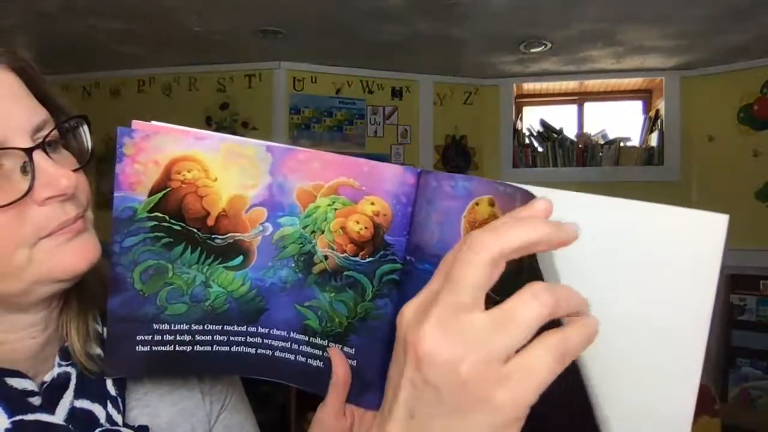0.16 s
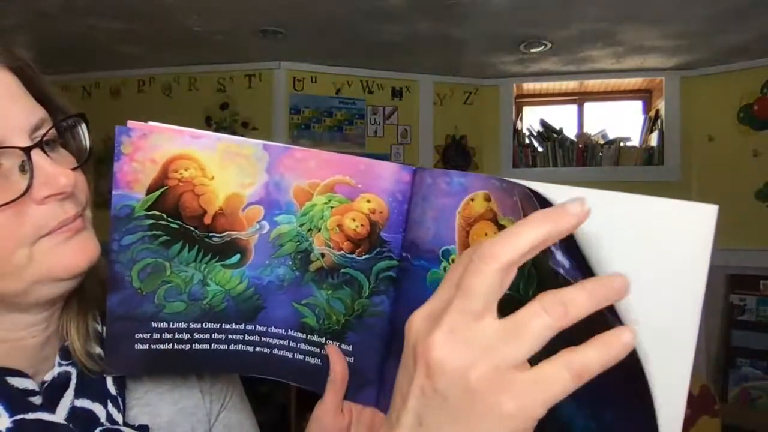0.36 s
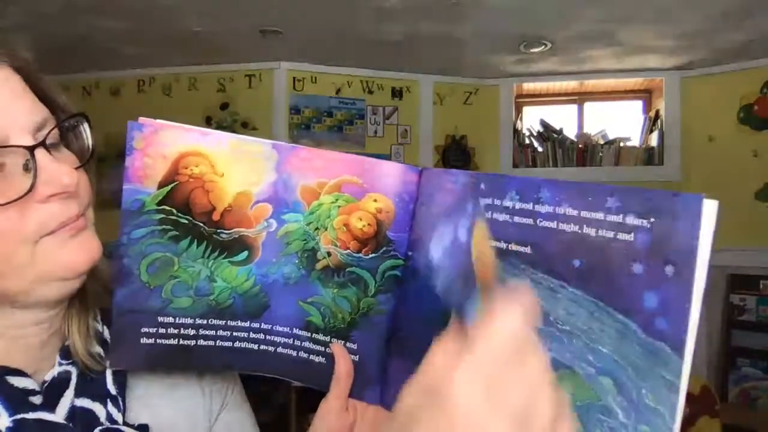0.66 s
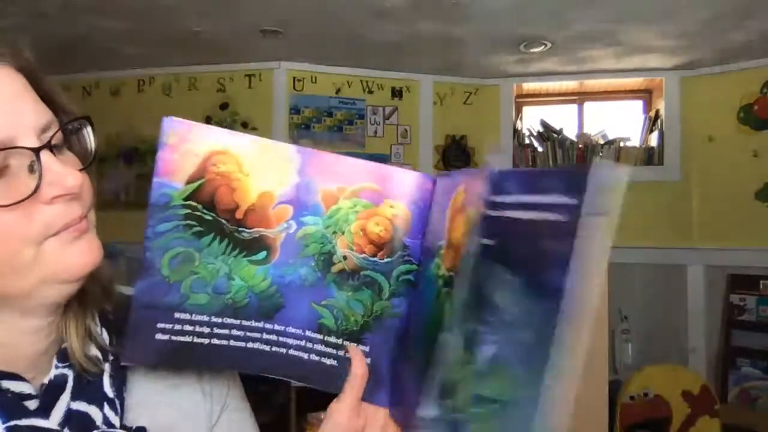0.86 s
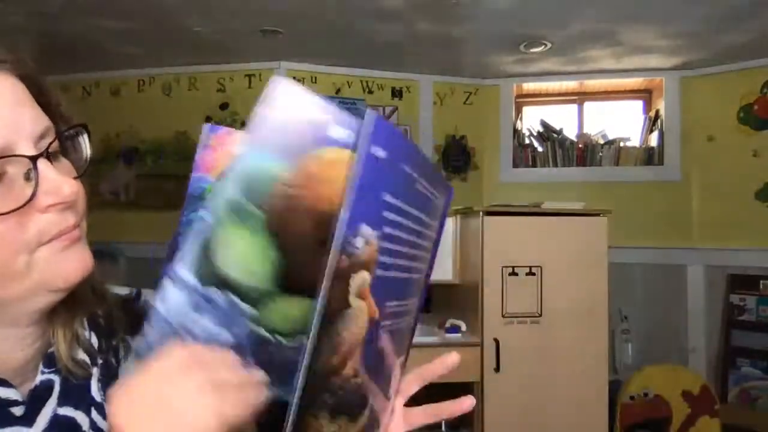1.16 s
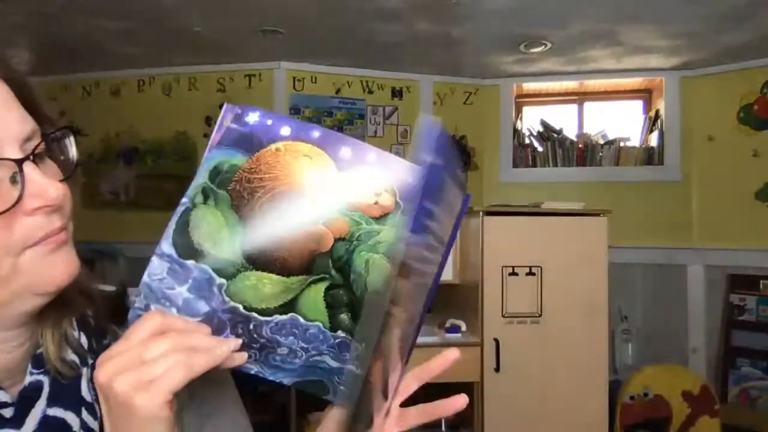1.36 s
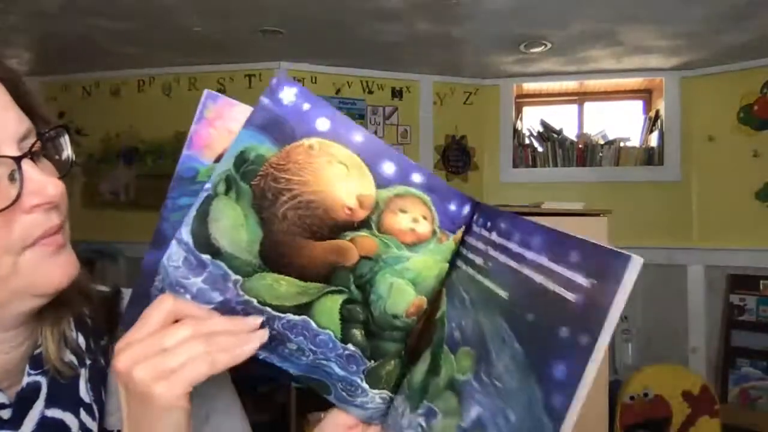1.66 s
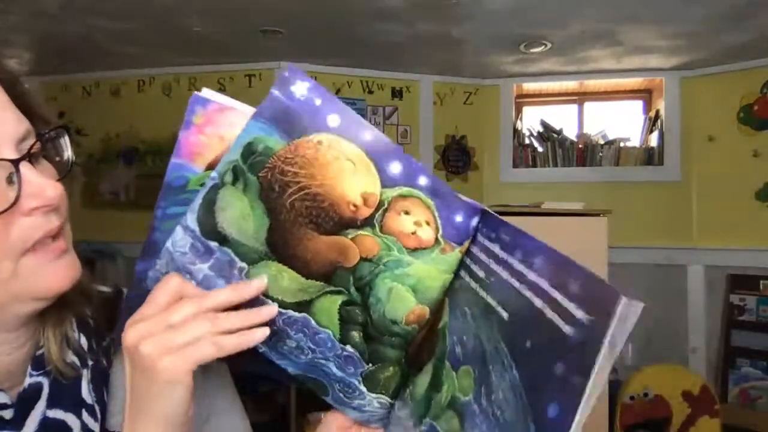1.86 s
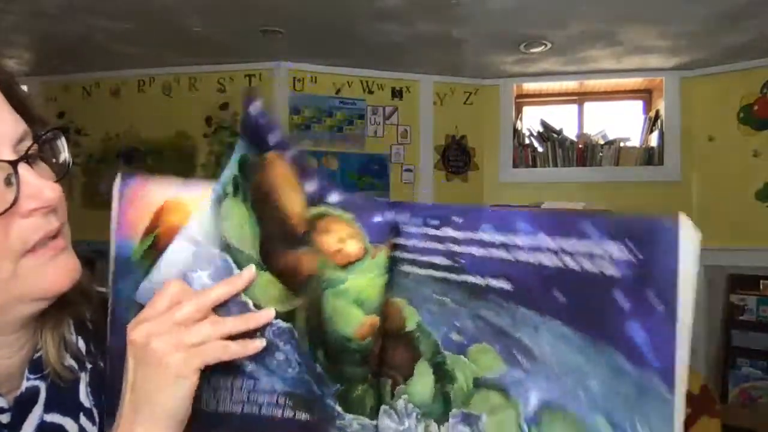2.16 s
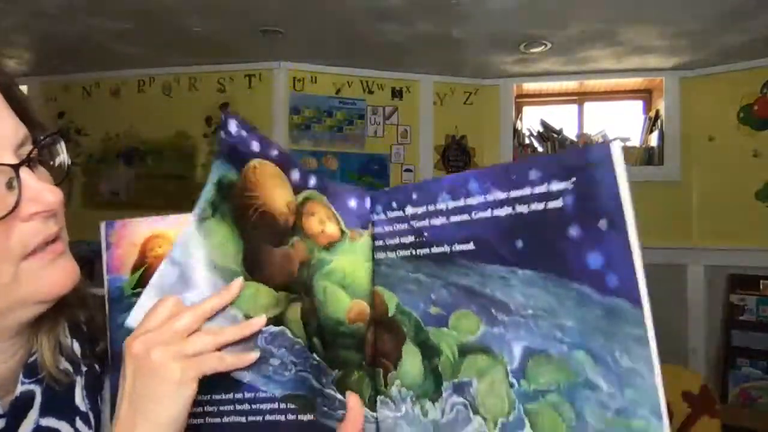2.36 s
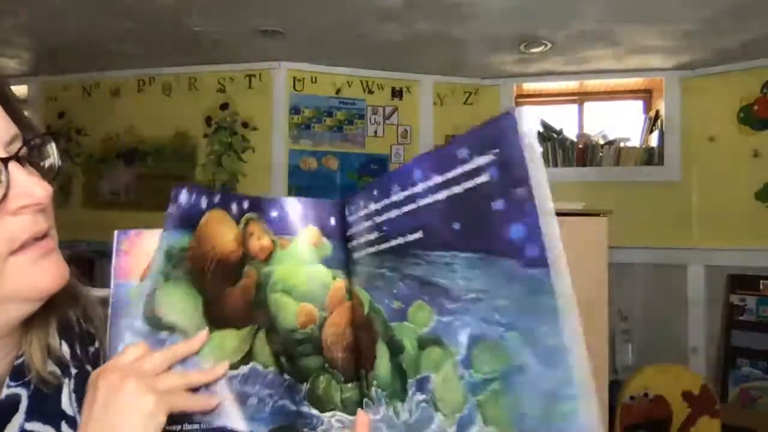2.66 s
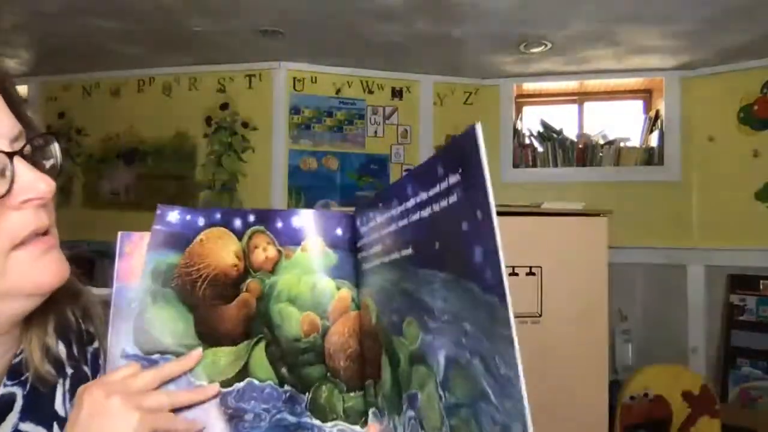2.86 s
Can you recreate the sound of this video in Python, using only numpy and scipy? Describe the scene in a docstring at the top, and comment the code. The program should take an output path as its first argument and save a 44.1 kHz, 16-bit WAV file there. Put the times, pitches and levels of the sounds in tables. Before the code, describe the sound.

A stiff glossy page of a big hardcover book is turned by hand: faint finger rub, papery swishes and light cover bumps, then loud crackling snaps near two seconds and a sliding rustle, close in a quiet room.

```python
"""Stiff page turn

A hand turns a stiff glossy page of a large hardcover book close to a mono microphone in a quiet room.
Sliding skin and paper hiss: dense clicks through a time-varying spectrum. The bending page crackles and
snaps: clicks and noise bursts ring its modes. A pocket of air squeezes out: a noisy tone that jumps up.
Covers wobble (sparse coloured clicks) and thump (decaying sines) over faint steady noise."""
import sys
import numpy as np
from scipy import signal
from scipy.io import wavfile
from scipy.ndimage import uniform_filter1d

SR = 44100
rng = np.random.default_rng(int(sys.argv[2]) if len(sys.argv) > 2 else 0)


def transcribe(signal):
    """Save signal, clipped to [-1, 1], as a 16-bit WAV file at the path in sys.argv[1]."""
    frames = np.atleast_2d(signal).T
    limited = np.clip(frames, -1, 1)
    pcm = np.round(limited * 32767).astype(np.int16)
    wavfile.write(sys.argv[1], SR, pcm)


def ratio_of_db(decibels):
    """Turn decibels (scalar or array-like) into linear amplitude factors; 0 dB maps to 1."""
    return 10 ** (np.asarray(decibels, float) / 20)


N = 132300

# room and microphone noise spectrum: f/Hz, density/dB (relative)
FLOOR_SPECTRUM = [(24, -51), (40, -0.5), (185, -17), (1240, -34), (16000, -46)]
FLOOR_DB = -71.5

# covers wobbling in the hands: t/s, level/dB, brightness/(dB/octave)
WOBBLE_COURSE = [(0, -79, 1), (.36, -89, -15), (.39, -64.5, -12), (.55, -90, 5), (.59, -57.5, -10),
                 (.65, -39, 2), (.76, -74.5, 2), (.82, -41, -0.5), (.945, -41, 1), (.99, -53.5, -5),
                 (1.06, -50, 1), (1.12, -59, 6.3), (1.19, -50, -0.5), (1.27, -60, 7), (1.36, -75, 0),
                 (1.4, -46, -10), (1.48, -47.5, -11), (1.51, -65.5, 1), (1.91, -47, 0), (1.96, -28, -1),
                 (2.1, -41.5, -9.5), (2.28, -53.5, 8.5), (2.39, -41, -2.5), (2.65, -48.5, 12),
                 (2.69, -45, 0.5), (2.87, -56, 3.5), (2.94, -82, -2), (3, -29.5, -12)]
# cover spectrum: f/Hz, density/dB (relative)
WOBBLE_SPECTRUM = [(40, -8.5), (200, 0.7), (400, -4.5), (600, -4.5), (1000, -29.5), (1500, -43)]
KNOCKS_PER_S, KNOCK_SPREAD_DB, WOBBLE_PATCH_DB = 500, 3, 2.5

# fingers bumping the covers: t/s, level/dB, f/Hz
COVER_THUMPS = [(.816, -28, 340), (.849, -30, 260), (.872, -28, 240), (.886, -29, 200), (.941, -25, 520),
                (2.3165, -18, 870), (2.348, -25, 680)]
THUMP_CYCLES_PER_20DB = 6

SQUEEZE_START_S, SQUEEZE_LENGTH_S, SQUEEZE_DB = 2.0565, .022, -17
SQUEEZE_FROM_HZ, SQUEEZE_TO_HZ, SQUEEZE_WIDTH_HZ = 850, 1480, 250
SQUEEZE_STEADY = 2.2  # steady part of the tone over rms of its noisy part
SQUEEZE_BEND = 9  # steepness of the pitch jump
SQUEEZE_HISS_DB = -20  # relative to the tone

# page modes: f/Hz, level/dB, t60/s (at ring share 1)
PAGE_MODES = [(845, -4, 0.045), (1090, -7, 0.03), (1380, -5, 0.037), (1730, -6, 0.03), (2150, -2, 0.04),
              (2590, -12, 0.025), (3130, -10, 0.022), (4165, -15, 0.012), (5900, -14, 0.009)]
MODE_RISE_S, PAGE_LOW_HZ = 0.00012, 600

# page snaps: t/s, ring peak/dB, dullness/(dB/octave)
PAGE_SNAPS = [(.585, -21, -4), (.821, -24, 3), (.85, -20, -1), (1.1195, -29, 0), (1.125, -35, -2),
              (1.133, -37, 0), (1.1485, -23, 0), (1.154, -31, -3), (1.174, -24, 1), (1.1795, -33, -2),
              (1.208, -36, 9), (1.247, -30, 9), (1.528, -32, -4), (1.778, -15, 4), (1.801, -14, -1),
              (1.935, -4, -.5), (1.9535, -4, -2), (1.977, -14, 12), (1.997, -18, 12), (2.118, -17, 2),
              (2.316, -23, -2), (2.349, -25, 6)]
SNAP_RING_SHARE, RING_SHARE_PER_DB = 1.45, 0.06  # share of mode t60 at 0 dB; harder snaps ring longer
SNAP_DETUNE, SNAP_RATTLE, RATTLE_DECAY_S = .02, .07, .005  # decay at ring share 1
CRACK_DB, CRACK_DECAY_S, CRACK_TOP_HZ = -21.0206, .0007, 12000  # noise rms for a 0 dB snap, before low-pass
CRACK_DB_PER_DB = -.6  # light snaps are mostly crack, hard ones mostly ring

# page bending: t/s, level/dB, dullness/(0-1)
BEND_COURSE = [(.55, -83, 0.47), (.6, -44, 0), (.73, -58.5, 0), (.81, -38, 0.74), (.96, -39, 0.37),
               (1.1, -56, 0.6), (1.18, -39.5, 0.73), (1.235, -55, 0.7), (1.29, -38.5, 0.42),
               (1.38, -54.5, 0.6), (1.44, -50, 1), (1.52, -62.5, 0.8), (1.535, -50, 0.84),
               (1.6, -46.5, 0.54), (1.625, -34, 0.53), (1.66, -41.5, 1), (1.7, -32.5, 0.85),
               (1.78, -23, 0.28), (1.86, -35.5, 0.26), (1.93, -37, 0.33), (1.97, -27.5, 1),
               (2.04, -34, 0.74), (2.11, -34, 0.34), (2.3, -49.5, 0.7), (2.37, -41.5, 0.74),
               (2.8, -47.5, 0.85), (3, -37, 0.3)]
CRACKLES_PER_S, CRACKLE_SPREAD_DB = 4800, 2.5
CRACKLE_RING_SHARE, CRACKLE_DETUNE = 0.26, 0.22
DULL_DB_PER_OCT, BRIGHT_DB_PER_OCT = 12.5, -5  # fall above 1300 Hz

# sheet or finger sliding: t/s, level/dB, brightness/(dB/octave)
SLIDE_COURSE = [(0, -60, -5), (.04, -53.5, 1.5), (.35, -51, 1.5), (.405, -43.5, 5.5), (.43, -65, -3),
                (.47, -79.5, -9), (.548, -87, -11), (.56, -57, 1), (.58, -37, 1.5), (.6, -33.5, 8),
                (.68, -35, 8.5), (.695, -50, 20), (.73, -62, 4), (.742, -33, 5.5), (.78, -39, 2.5),
                (.91, -35.5, 9), (.925, -33, 3), (1.02, -37, 5.5), (1.09, -60, -2), (1.115, -48, 6),
                (1.142, -52, -5), (1.152, -42.5, 8), (1.19, -46.5, 14), (1.23, -51, 27), (1.3, -44, 1.5),
                (1.38, -62, 2), (1.41, -46, -1), (1.46, -68, 3), (1.52, -81, -2), (1.53, -56, 2.5),
                (1.71, -41.5, 13), (1.76, -32.5, 1.5), (1.81, -26, 6.5), (1.85, -39.5, 11.5),
                (1.93, -39, 2), (1.955, -25.5, -5.5), (1.98, -35, 2.5), (2.04, -31, 7), (2.07, -20.5, -0.9),
                (2.09, -31.5, 9), (2.24, -31.5, 3), (2.29, -41, 2), (2.312, -39.5, 6.5), (2.32, -33.5, 1.5),
                (2.71, -27.5, 1.05), (2.77, -33.5, 0), (2.81, -44, 1), (2.85, -35, -1), (3, -41, 1.5)]
# sliding spectrum: f/Hz, density/dB (relative)
SLIDE_SPECTRUM = [(180, -23), (300, -14.5), (870, -7), (1610, -1), (2360, -7.5), (3460, -6), (7800, -11),
                  (10500, -7.5), (16000, -14)]
# air under a curled corner: f at t=0/Hz, f at UNCURL_S/Hz, width/Hz, lift/dB
CURLED_AIR = [(1150, 1250, 350, 11), (2150, 1950, 350, 8), (2950, 3500, 350, 13), (6050, 5500, 500, 14)]
# air between flat sheets: f/Hz, width/Hz, lift/dB
FLAT_AIR = [(1620, 330, 4.5), (3115, 1030, 6.5), (5360, 2500, 6)]
UNCURL_S, FLAT_S = .42, .55  # curled-corner air fades out between these times, flat-sheet air fades in
SLIPS_PER_S, SLIP_SPREAD_DB = 7000, 1.5
SLIDE_FLICKER_DB, SLIDE_PATCH_DB = 1.2, 1.8

ROOM_T60_S, ROOM_DB = .1, -13
MIC_LOW_HZ, EDGE_HZ = 78, 15750


def evened(x):
    """Scales to rms 1."""
    return x / np.sqrt(np.mean(x ** 2) + 1e-20)


def read(points, hz):
    """Spectrum table read on a log-frequency axis."""
    f, value = np.transpose(points)
    return np.interp(np.log(hz + 1), np.log(f + 1), value)


def curve(rows, t, axis=1):
    """One column of a time table."""
    rows = np.array(rows)
    return np.interp(t, rows[:, 0], rows[:, axis])


def add(mix, s, sound):
    """Mixes a sound in at time s."""
    part = mix[round(s * SR):][:len(sound)]
    part += sound[:len(part)]


def clicks(per_s, spread_db):
    """Random clicks of random sign; a few are large."""
    size = ratio_of_db(spread_db * np.minimum(rng.exponential(1, N), 5))
    size = size * rng.choice([-1., 1.], N)
    return evened(size * (rng.random(N) < per_s / SR))


def coloured(x, field_db, size, patch_db):
    """Shapes x by a dB field over frequency and time, with drifting patches."""
    hz, t, z = signal.stft(x, SR, nperseg=size, noverlap=size * 3 // 4)
    patches = uniform_filter1d(rng.standard_normal(z.shape), size=5, axis=0)
    patches = uniform_filter1d(patches, size=20, axis=1)
    gain = ratio_of_db(field_db(hz[:, None], t) + patch_db * evened(patches))
    gain = gain / np.sqrt(np.mean(gain ** 2, axis=0) + 1e-20)
    return signal.istft(z * gain, SR, nperseg=size, noverlap=size * 3 // 4)[1][:N]


def floor():
    """Faint steady hiss of room and microphone."""
    hiss = coloured(rng.standard_normal(N), lambda hz, t: read(FLOOR_SPECTRUM, hz) + 0 * t,
                    size=1024, patch_db=1.5)
    return evened(hiss) * ratio_of_db(FLOOR_DB)


def wobble():
    """Soft low knocks and flaps of the covers: sparse clicks, coloured."""
    def field_db(hz, t):
        tilt_db = curve(WOBBLE_COURSE, t, axis=2) * np.log2(hz / 200 + 0.24)
        return read(WOBBLE_SPECTRUM, hz) + tilt_db
    knocks = clicks(KNOCKS_PER_S, KNOCK_SPREAD_DB)
    low = coloured(knocks, field_db, size=1024, patch_db=WOBBLE_PATCH_DB)
    return evened(low) * ratio_of_db(curve(WOBBLE_COURSE, np.arange(N) / SR))


def thumps():
    """Each bump is a short low ring of the board, rising over one cycle."""
    out, t = np.zeros(N), np.arange(3000) / SR
    for s, db, hz in COVER_THUMPS:
        decay = ratio_of_db(db - 20 * hz * t / THUMP_CYCLES_PER_20DB)
        add(out, s, decay * np.sin(2 * np.pi * hz * t) * np.minimum(hz * t, 1))
    return out


def squeeze():
    """Noisy tone of a pocket resonance that jumps up as the pocket closes, plus a faint puff."""
    u = np.arange(0, 1, 1 / (SR * SQUEEZE_LENGTH_S))
    jump = .5 + .5 * np.tanh(SQUEEZE_BEND * (u - .5))
    hz = SQUEEZE_FROM_HZ * (SQUEEZE_TO_HZ / SQUEEZE_FROM_HZ) ** jump
    carrier = np.exp(2j * np.pi * np.cumsum(hz) / SR)
    r = np.exp(-np.pi * SQUEEZE_WIDTH_HZ / SR)
    air = rng.standard_normal(len(u))
    unsteady = evened(signal.lfilter([1 - r], [1, -r], air))
    tone = (carrier * (SQUEEZE_STEADY + unsteady)).real
    puff = signal.lfilter(*signal.butter(2, 7000 / (SR / 2)), air)
    sound = evened(tone) + ratio_of_db(SQUEEZE_HISS_DB) * evened(puff)
    out = np.zeros(N)
    add(out, SQUEEZE_START_S, ratio_of_db(SQUEEZE_DB) * np.sin(np.pi * u) ** 0.059 * sound)
    return out


def ring(detune, slope_db, share):
    """The page's modes after one tick, neighbours starting in opposite directions."""
    t = np.arange(2000) / SR
    total = np.zeros(len(t))
    for k, ((hz, db, t60), d) in enumerate(zip(PAGE_MODES, detune)):
        level_db = db - slope_db * np.log2(hz / 1300)
        decay = ratio_of_db(level_db - 60 * t / (t60 * max(share, .05)))
        total += (-1) ** k * decay * np.sin(2 * np.pi * hz * d * t)
    return (1 - np.exp(-t / MODE_RISE_S)) * total


def snaps():
    """Each snap is a wide crack plus a brief rattle into all the page's modes."""
    out, t = np.zeros(N), np.arange(800) / SR
    draws = rng.standard_normal((len(PAGE_SNAPS), 1600 + len(PAGE_MODES)))
    edge = signal.butter(3, CRACK_TOP_HZ, fs=SR)
    for (s, db, dull_db), d in zip(PAGE_SNAPS, draws):
        share = np.clip(SNAP_RING_SHARE + RING_SHARE_PER_DB * db, .2, 1.5)
        rattle = SNAP_RATTLE * d[:800] * np.exp(-t / (RATTLE_DECAY_S * share))
        modes = ring(1 + SNAP_DETUNE * d[1600:], dull_db, share)
        snap = signal.fftconvolve(rattle + (t == 0), modes)
        add(out, s, ratio_of_db(db) * snap / abs(snap).max())
        crack = signal.lfilter(*edge, d[800:1600]) * np.exp(-t / CRACK_DECAY_S)
        add(out, s, ratio_of_db(db + CRACK_DB + CRACK_DB_PER_DB * db - dull_db) * crack)
    return out


def bend():
    """Dense small buckles of the bending page; each spot rings the modes a little off pitch."""
    drive, spot = clicks(CRACKLES_PER_S, CRACKLE_SPREAD_DB), rng.integers(0, 12, N)
    detunes = 1 + CRACKLE_DETUNE * rng.standard_normal((12, len(PAGE_MODES)))

    def crackle(slope_db):
        spots = [signal.oaconvolve(drive * (spot == k), ring(d, slope_db, CRACKLE_RING_SHARE))[:N]
                 for k, d in enumerate(detunes)]
        return evened(sum(spots))
    t = np.arange(N) / SR
    dull = np.clip(curve(BEND_COURSE, t, axis=2), 0, 1)
    mixed = dull * crackle(DULL_DB_PER_OCT) + (1 - dull) * crackle(BRIGHT_DB_PER_OCT)
    return mixed * ratio_of_db(curve(BEND_COURSE, t)) * (t > BEND_COURSE[0][0])


def slide():
    """Dense tiny slips of skin and paper, coloured by the air gap between the sheets."""
    def peak_db(hz, centre, width, lift_db):
        return lift_db / (1 + (2 * (hz - centre) / width) ** 2)

    def field_db(hz, t):
        curled = sum(peak_db(hz, a + (b - a) * t / UNCURL_S, w, db) for a, b, w, db in CURLED_AIR)
        flat = sum(peak_db(hz, f, w, db) for f, w, db in FLAT_AIR)
        curl = np.interp(t, [UNCURL_S, FLAT_S], [1, 0])
        tilt_db = curve(SLIDE_COURSE, t, axis=2) * np.log2(hz / 5000 + 0.053)
        return read(SLIDE_SPECTRUM, hz) + curl * curled + (1 - curl) * flat + tilt_db
    slips = clicks(SLIPS_PER_S, SLIP_SPREAD_DB)
    hiss = coloured(slips, field_db, size=256, patch_db=SLIDE_PATCH_DB)
    flicker = evened(uniform_filter1d(rng.standard_normal(N), size=300))
    level_db = curve(SLIDE_COURSE, np.arange(N) / SR) + SLIDE_FLICKER_DB * flicker
    return evened(hiss) * ratio_of_db(level_db)


def room(x):
    """Adds a short tail of sparse reflections."""
    t = np.arange(6000) / SR
    echoes = rng.choice([-1., 1.], 6000) * (rng.random(6000) < .05)
    tail = echoes * ratio_of_db(-60 * t / ROOM_T60_S) * (t > .003)
    return x + ratio_of_db(ROOM_DB) * signal.oaconvolve(x, tail / np.linalg.norm(tail))[:N]


def scene():
    """All sources at one microphone, copied to both channels; the thin page radiates no bass."""
    high = signal.butter(3, PAGE_LOW_HZ, "high", fs=SR, output="sos")
    page = signal.sosfilt(high, bend() + snaps() + squeeze())
    mono = room(slide() + page + thumps()) + wobble() + floor()
    return np.array([mono, mono])


def top_cut(x):
    """Nothing passes above the cut-off."""
    return signal.sosfilt(signal.butter(12, 16960, fs=SR, output="sos"), x)


def record(dry):
    """Bass roll-off of the microphone, then band limit."""
    high = signal.butter(3, MIC_LOW_HZ, "high", fs=SR, output="sos")
    thin = signal.sosfilt(high, dry)
    edge = signal.firwin(511, EDGE_HZ, window=("kaiser", 9), fs=SR)
    mix = signal.oaconvolve(thin, edge[None], "same")
    return top_cut(mix)


dry = scene()
out = record(dry)
transcribe(out)
```